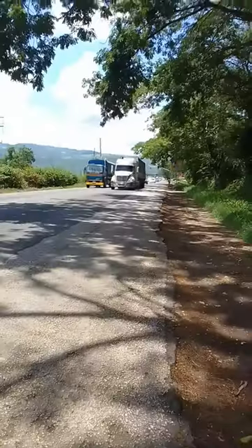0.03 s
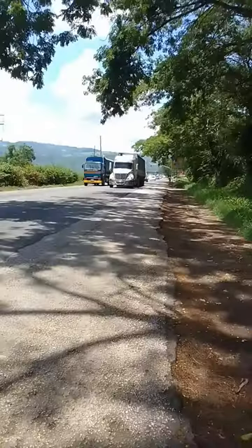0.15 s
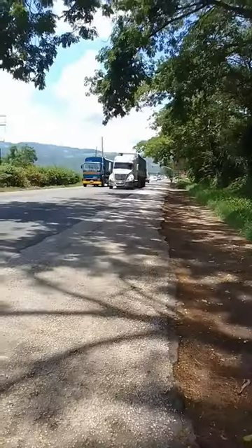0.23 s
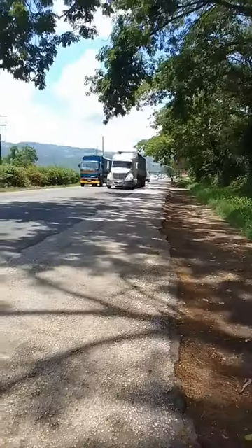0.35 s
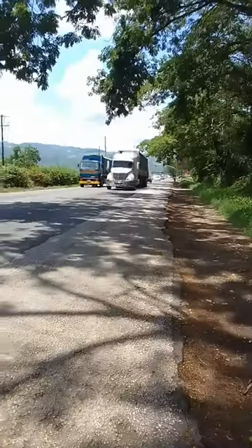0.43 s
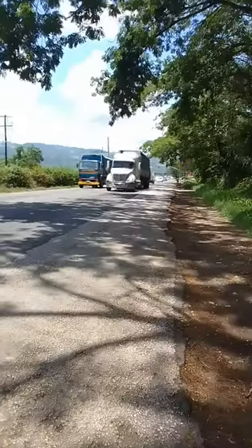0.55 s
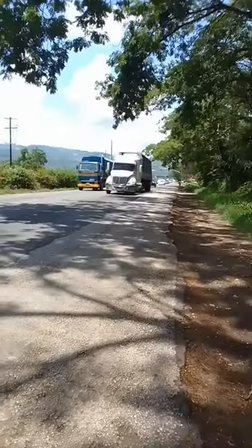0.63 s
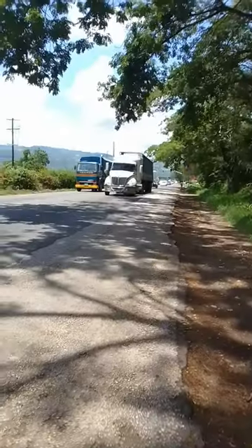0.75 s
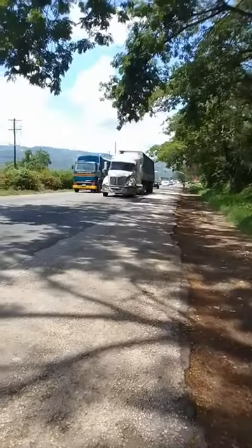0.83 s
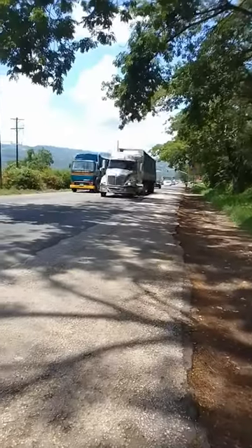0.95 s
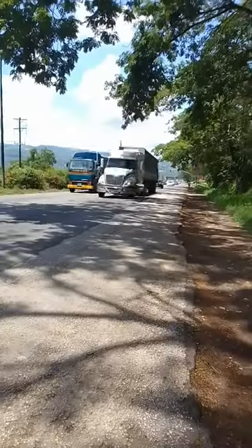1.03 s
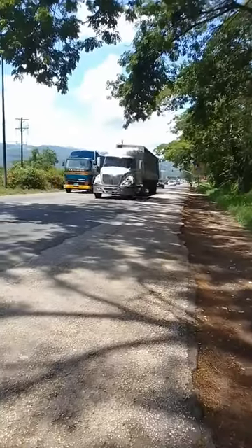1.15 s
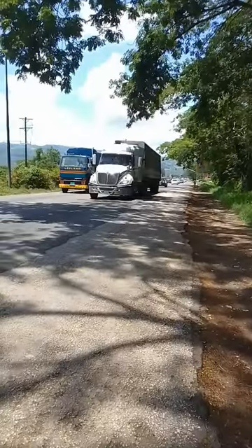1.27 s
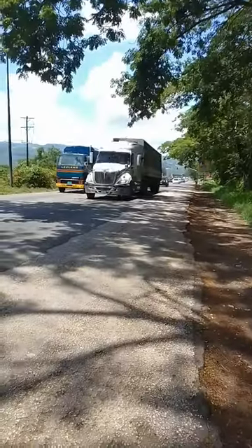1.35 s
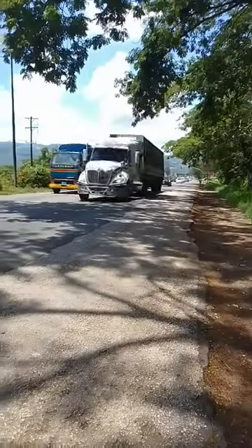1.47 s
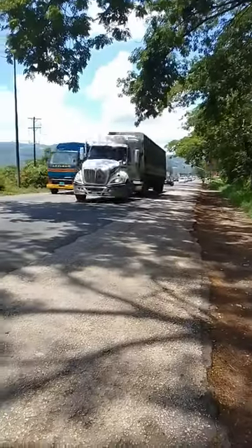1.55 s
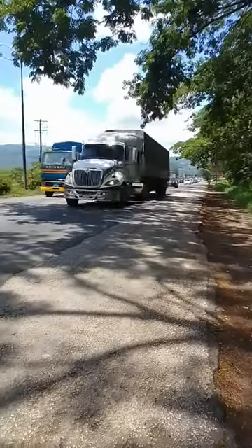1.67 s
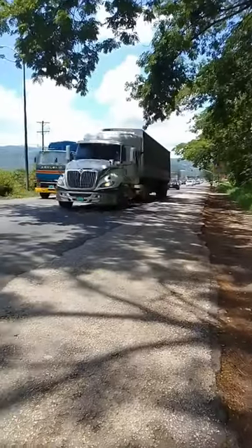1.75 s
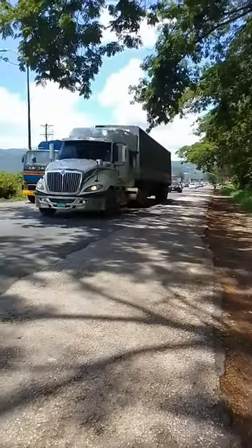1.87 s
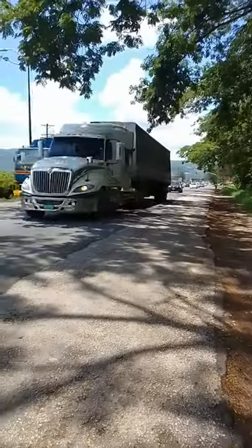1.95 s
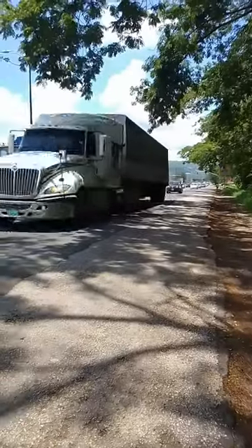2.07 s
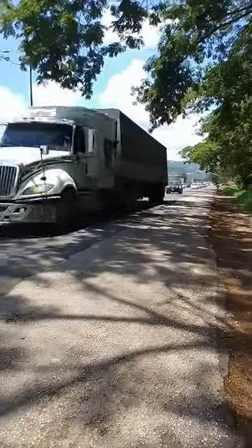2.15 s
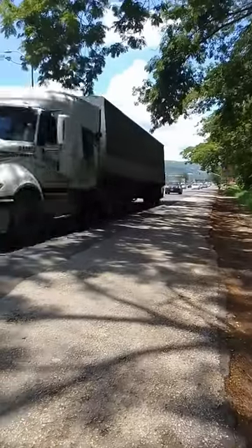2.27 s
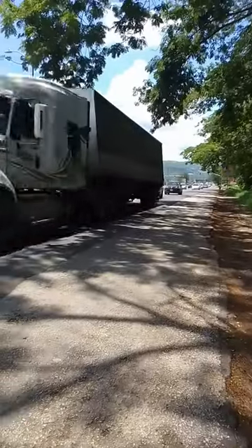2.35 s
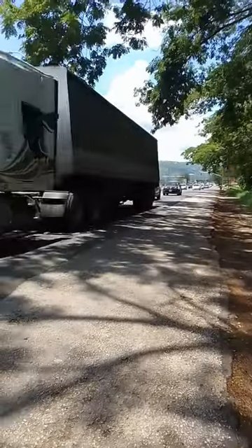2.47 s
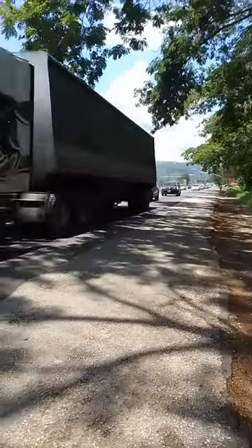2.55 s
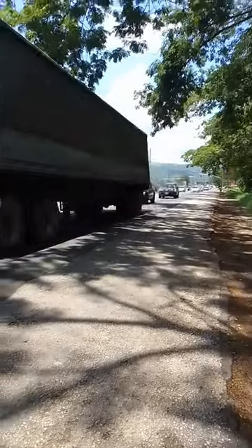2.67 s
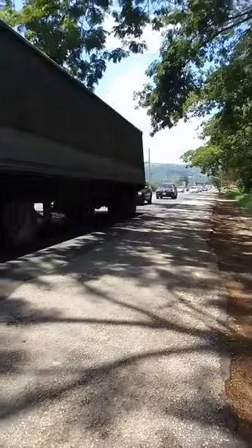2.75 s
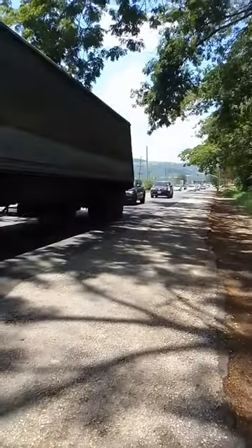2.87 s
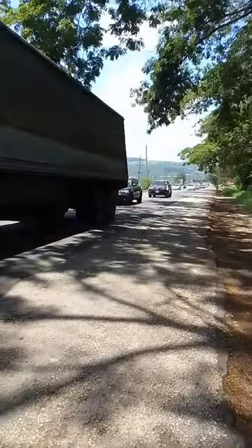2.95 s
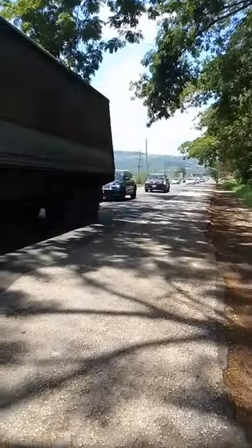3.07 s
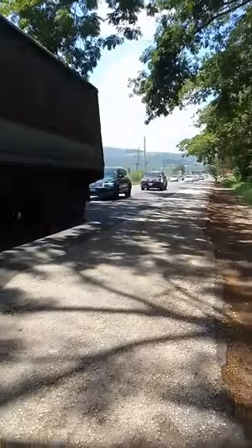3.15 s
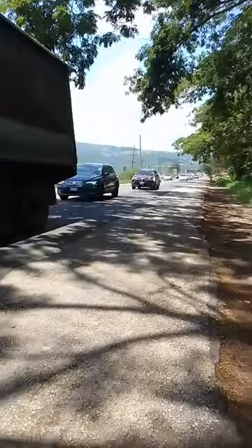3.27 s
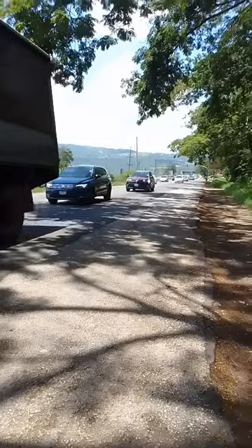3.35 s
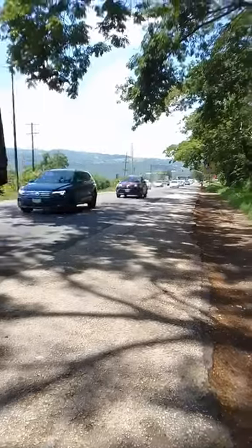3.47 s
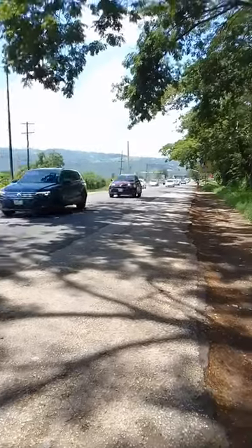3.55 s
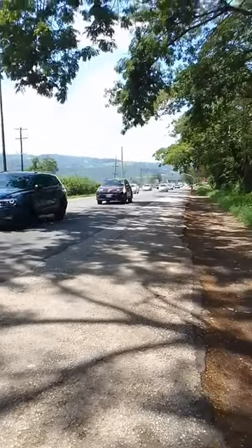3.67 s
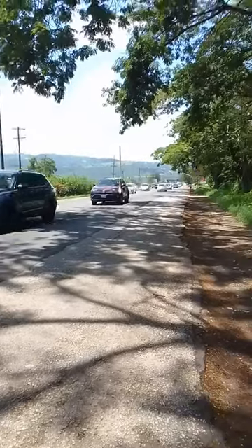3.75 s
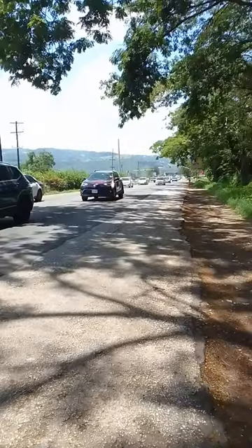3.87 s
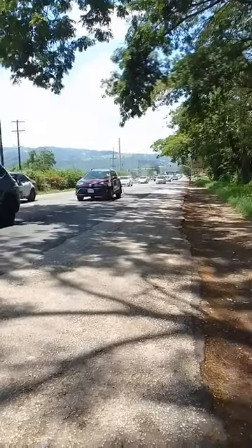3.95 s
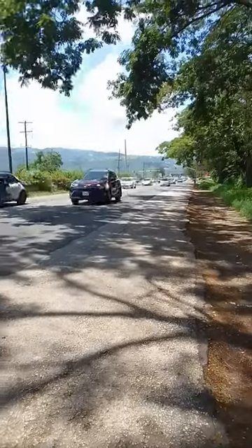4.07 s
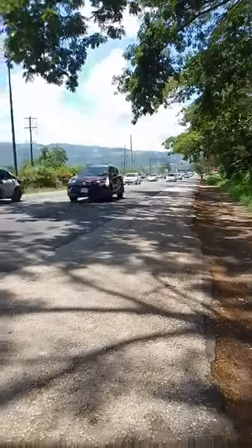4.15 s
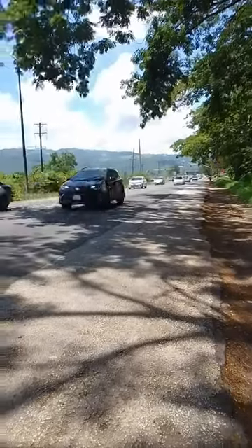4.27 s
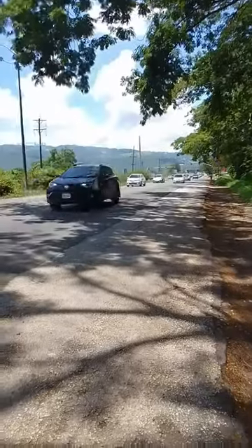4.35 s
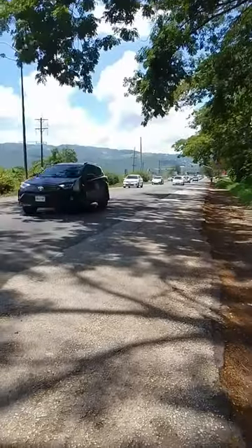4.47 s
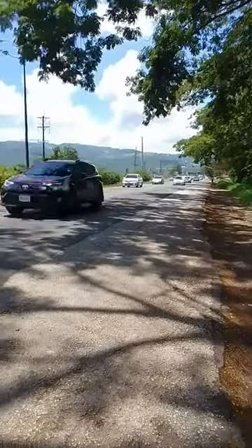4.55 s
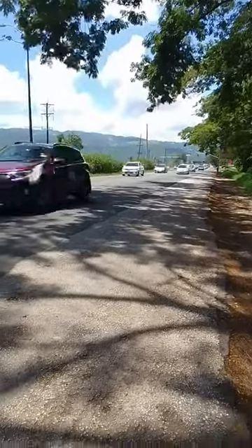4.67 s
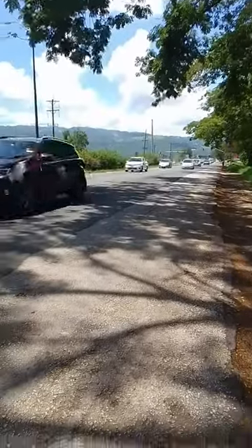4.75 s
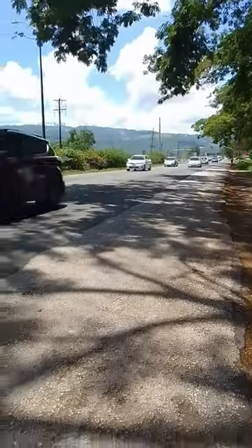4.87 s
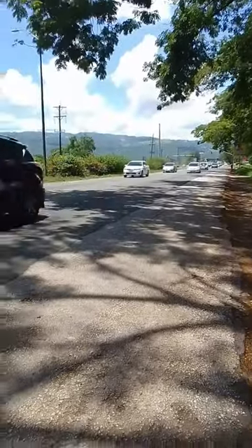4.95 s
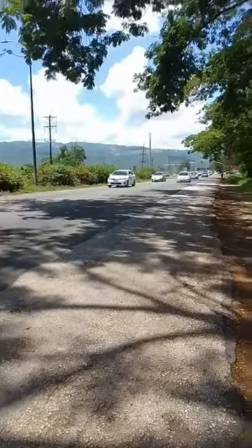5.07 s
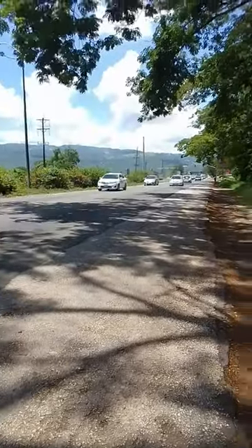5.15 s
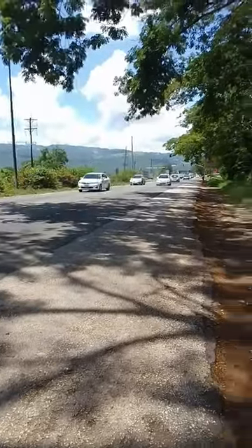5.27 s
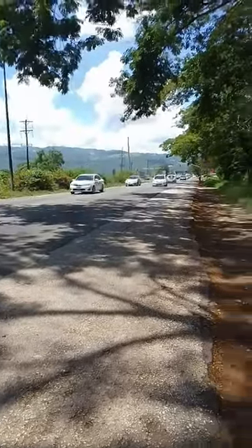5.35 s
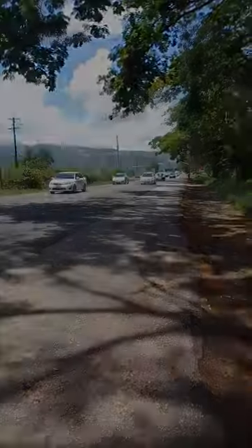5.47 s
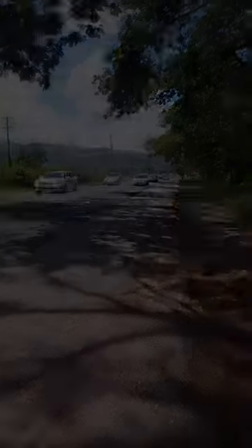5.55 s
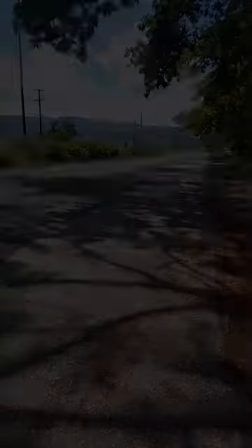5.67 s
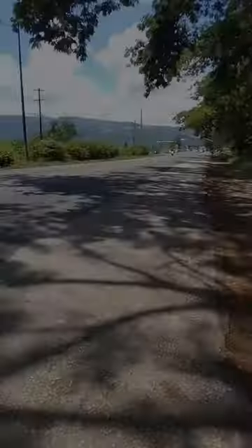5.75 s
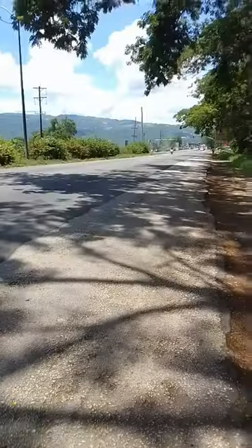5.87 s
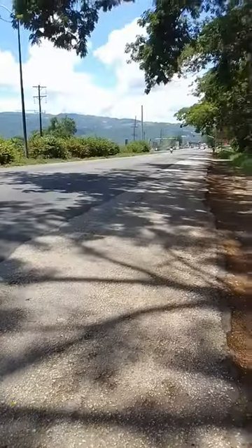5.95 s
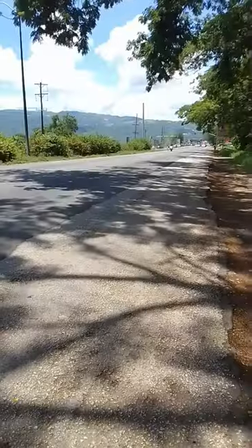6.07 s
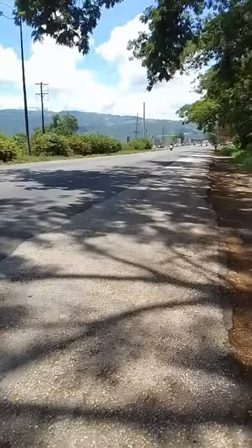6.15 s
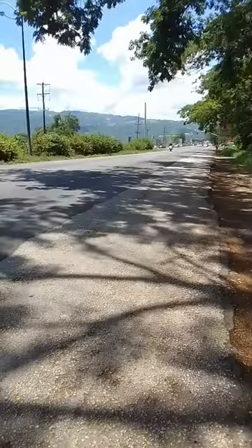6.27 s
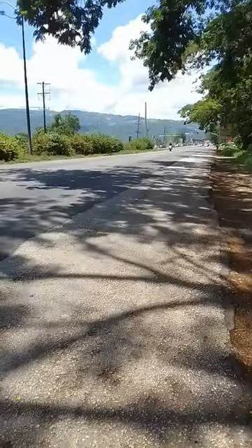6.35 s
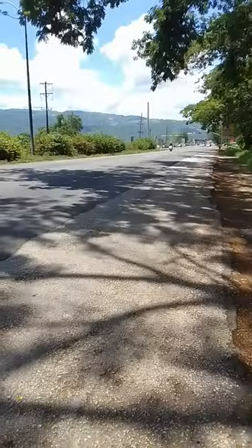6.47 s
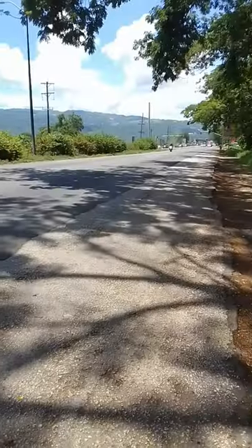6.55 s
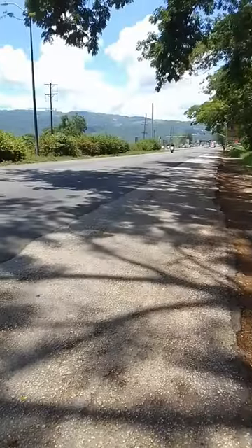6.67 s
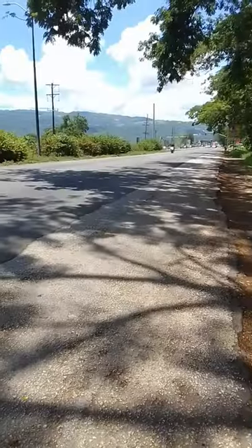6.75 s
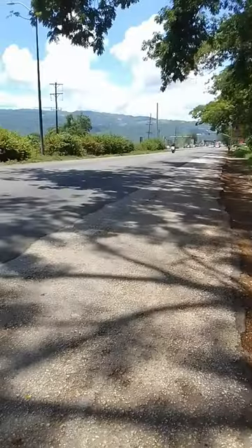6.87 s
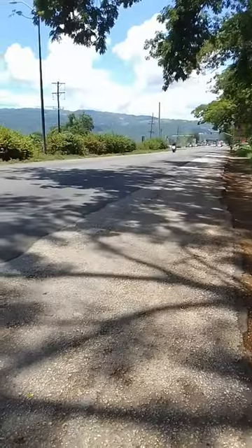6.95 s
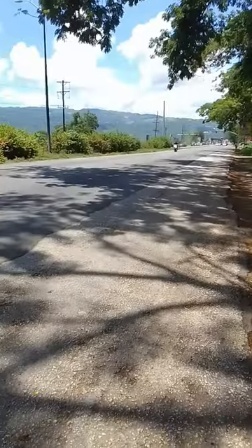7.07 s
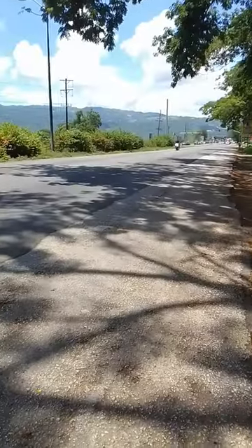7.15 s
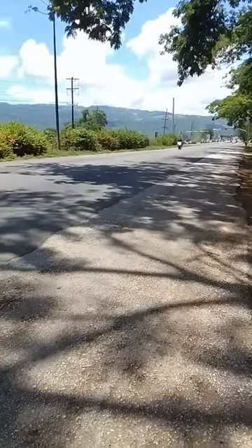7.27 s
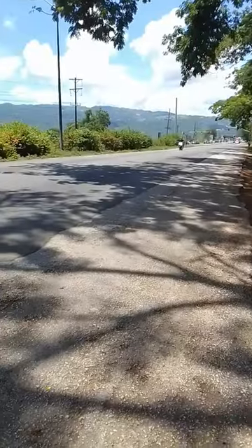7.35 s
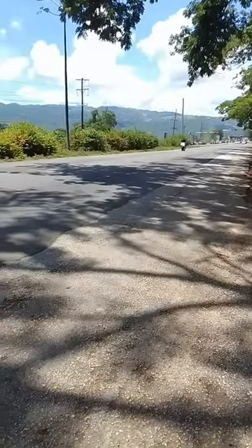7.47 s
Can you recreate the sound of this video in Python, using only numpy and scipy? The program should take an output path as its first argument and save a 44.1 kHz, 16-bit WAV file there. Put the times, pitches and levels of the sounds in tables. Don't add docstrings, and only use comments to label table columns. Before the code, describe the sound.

From 0 s a lorry approaches along an open road, its rough exhaust boom throbbing, with a short bark at the start and another at 0.7. Tyre roar, air hiss and a whirring fan swell from about 1 s to a loud close pass around 2.3-3.7, slightly overloading the microphone, the exhaust note sagging in pitch. Clipped air-horn toots sound at 3.0, 3.5, 3.85 and 3.95, the last two softer. Brake puffs, squeaks and trailer chirps scatter from 2.8 to 5.1. From about 4.2 a second diesel knocks quickly and unevenly while the rush recedes into following-car roar. At 5.64 everything cuts to silence. At 6.44 a much quieter, dull distant road appears with a far motorbike's fluttering, tonal drone, rising slowly. A tiny click falls at 6.75. At 7.25 the throttle shuts, pitch drops with a blip, recovers near 7.45, then falls into the new gear.

```python
import sys
import numpy as np
from scipy import signal
from scipy.fft import rfft, irfft, next_fast_len
from scipy.io import wavfile
from scipy.ndimage import uniform_filter1d, map_coordinates

SR = 44100
rng = np.random.default_rng(int(sys.argv[2]) if len(sys.argv) > 2 else 0)


def put_to_file(sound):
    columns = np.atleast_2d(sound).T
    safe = np.clip(columns, -1, 1)
    whole_steps = np.round(safe * 32767)
    wavfile.write(sys.argv[1], SR, whole_steps.astype(np.int16))


def to_linear_factor(level_db):
    exponent = np.asarray(level_db, float) / 20
    return 10 ** exponent


N = 331632

# time_s, nearness_db, engine_effort_db
LORRY_PASS = [(0.0, -36.5, 0.8), (0.5, -34.5, 0.7), (1.14, -29.5, -1.2), (1.25, -29.5, -0.6),
              (2.08, -24.5, 0.1), (2.26, -21, -1.3), (2.92, -19.5, -0.2), (3.07, -20.5, 2.8),
              (3.3, -21.5, 2.8), (3.5, -19, -2.5), (3.7, -21.5, 0.3), (4.15, -28.5, 1.2), (4.32, -29.5, 1),
              (4.88, -31, -4.2), (5.46, -35.5, -3.5), (5.63, -34, -3.5)]
# time_s, half_width_s, exhaust_change_db, air_change_db
SURGES = [(0.033, 0.056, 9.5, 1), (0.7, 0.019, 9, 0.5), (2.32, .05, 1, 1), (2.5, 0.025, 1, 2.5),
          (3.07, 0.024, -3.5, 10.5), (3.9, 0.038, 3.5, 1.5), (4.2, 0.028, -1.3, 3.5), (3.7, 0.08, -0.9, -4),
          (4.6, .007, 1.5, 7), (3.76, 0.044, -5, -.7), (2.5, 0.015, 0.5, 1), (4.0, 0.052, -4.5, 1.2),
          (6.3, 0.015, 4, 2), (4.615, 0.033, -7, 3.5), (4.69, 0.033, 0.6, 2.5), (2.42, 0.075, -1.5, -0.5)]
# frequency_hz, density_db
BOOM_COLOUR = [(18, -79.5), (30, -47), (70, -35.5), (119, -9), (225, 5), (274, 2.5), (309, 2.5),
               (347, -4.5), (444, -7), (500, -5), (650, -44.5), (1100, -120)]
# frequency_hz, density_db
ROAR_COLOUR = [(250, -39.5), (380, -1.5), (520, 2), (640, 2.5), (790, 1.5), (880, -2.5), (1000, -2),
               (1250, -4), (1550, -8), (1900, -12.5), (2500, -30.5), (3500, -29.5), (5000, -67.5)]
# frequency_hz, density_db
HISS_COLOUR = [(1500, -42.5), (2500, -2), (3500, -7), (5300, -9.5), (7000, -5.5), (8100, 0), (9300, -6),
               (11000, -15.5), (14000, -29), (16000, -32.5)]
# frequency_hz, density_db
FIZZ_COLOUR = [(8000, -39.5), (10500, -3), (12000, -5.5), (14000, -6.5), (16000, -12)]
# frequency_hz, density_db
FAN_COLOUR = [(1300, -40.5), (1700, 8.5), (2300, 11), (2700, -19), (3200, -36), (4500, -55.5)]
# time_s, half_width_s, third_gain_db, fourth_gain_db
PIPE_SWINGS = [
    (.6, 0.44, -13, 6),
    (2.0, .15, 3.5, 3),
    (2.5, 0.072, 7.5, -3),
    (2.68, .1, -7.5, 13.5),
    (3.22, .2, 12, 6),
    (3.8, 0.23, -9, -1.2),
]
HORN_OVERTONES = [(-0.5, -12, -5.5, -8, -22.5), (0, -4, -8, -21.5, -34.5), (-4, -2, -15, -21, -27.5)]
HORN_HZ = [415, 554, 791]
# start_s, length_s, low_horn_db, middle_horn_db, high_horn_db
TOOTS = [
    (3.027, 0.068, -36.5, -3, -4.5),
    (3.501, 0.084, -9, -11, -9),
    (3.854, .075, -40, -16.5, -15.5),
    (3.941, .06, -38, -17.5, -32),
]
TOOT_PITCH = [1.016, 1, 1, 1]
# start_s, length_s, centre_hz, width_hz, level_db
BRAKE_PUFFS = [(2.84, .04, 13000, 5000, -35), (3.04, .06, 9000, 12000, -27), (3.38, .03, 12000, 8000, -33),
               (3.415, .012, 11000, 8000, -29), (3.845, .012, 10000, 9000, -23),
               (3.82, .07, 11300, 200, -35), (4.0, .11, 11100, 200, -35), (4.165, .03, 13400, 300, -39),
               (4.258, .02, 8100, 5000, -26), (4.25, .05, 15500, 300, -49), (4.53, .09, 15470, 300, -51),
               (4.325, .03, 4200, 500, -30), (4.51, .03, 4300, 400, -33), (4.225, .025, 10900, 300, -37),
               (4.298, .02, 5600, 200, -31), (4.585, .045, 9700, 250, -26), (4.6, .035, 7000, 11000, -28),
               (4.655, .04, 9900, 500, -29), (4.67, .01, 4000, 3000, -29), (4.75, .03, 3000, 700, -29),
               (4.93, .15, 8200, 800, -28), (4.7, .02, 4500, 600, -33)]
# start_s, end_s, level_db
RATTLE = (3.25, 5.1, -37)
CYLINDER_DB = [0, -14, -6, -12, -9, -14]
# centre_hz, width_hz, level_db
BLOCK_MODES = [(187, 31, 11.5), (253, 44, 4), (740, 30, 1.5), (946, 130, 7), (1298, 400, -3.5),
               (3090, 1500, -24)]
# start_s, end_s
SILENCE = (5.6362, 6.4352)
# time_s, firing_hz, throttle_db
GEAR_SHIFT = [
    (7.25, 237.5, -0.9),
    (7.28, 222, -12),
    (7.315, 226, -1),
    (7.36, 207, -6.5),
    (7.397, 180, -10),
    (7.43, 205, -2),
    (7.46, 221, 1.5),
    (7.485, 228, 2.5),
    (7.52, 190, -1),
]
# multiple, level_db, db_per_throttle_db, flutter_crest_db, flutter_trough_db
BIKE_TONES = [(1, -20.5, 0.52, -2.5, -0.3), (2, -29.5, 1.7, 3.5, -5.5), (3, -40, 0.88, -11, -0.5),
              (5, -45.5, .6, -9.5, -2)]
BIKE_ORDERS = [.75, 1.75, 2.25, 2.5, 4, 4.25, 5.25, 6, 7, 8]
ORDER_DB = [-30, -37, -38, -42, -33, -46, -48, -48, -43, -48]
# frequency_hz, density_db
FAR_COLOUR = [(24, -74.5), (70, -31.5), (150, -5.5), (190, -2.5), (300, -10), (420, -20.5), (560, -16),
              (700, -10.5), (1000, -24.5), (1600, -29), (2400, -40.5), (3000, -45.5), (9000, -51),
              (15700, -55.5)]
# time_s, level_db
CLICK = (6.747, -31)


def unit(x):
    return x / np.sqrt(np.mean(x ** 2) + 1e-20)


def curves(rows):
    time_s, *columns = np.transpose(rows)
    return [np.interp(np.arange(N) / SR, time_s, column) for column in columns]


def wobble(rate):
    knots = rng.standard_normal(int(N * rate / SR) + 4)
    return map_coordinates(knots, [np.arange(N) * rate / SR])


def step(at_s, width_s):
    u = (np.arange(N) / SR - at_s) / width_s
    return (1 + u / np.sqrt(1 + u * u)) / 2


def bumps(rows):
    t = np.arange(N) / SR
    return sum(np.outer(db, np.exp(-((t - s) / width) ** 2)) for s, width, *db in rows)


def window(start_s, length_s, edge_s):
    t = np.arange(N) / SR - start_s
    return np.clip(np.minimum(t, length_s - t) / edge_s + .5, 0, 1) ** 2


def filtered(x, response):
    size = next_fast_len(N + 8192)
    return irfft(rfft(x, size) * response(np.fft.rfftfreq(size, 1 / SR)), size)[:N]


def rush(colour, patchy_db, gate=1):
    z = signal.stft(rng.standard_normal(N + 512), nperseg=512)[2]
    patches = uniform_filter1d(rng.standard_normal(z.shape), size=4, axis=0)
    patches = uniform_filter1d(patches, size=10, axis=1)
    noise = signal.istft(z * to_linear_factor(patchy_db * unit(patches)), nperseg=512)[1][:N]
    f, db = np.transpose(colour)
    response = lambda hz: to_linear_factor(np.interp(np.log(hz + 1), np.log(f), db, -120, -120))
    return unit(filtered(noise * gate, response))


def far_road():
    gaps = lambda f: np.where(f > 2300, np.abs(np.sin(np.pi * f / 1510)) ** .7, 1)
    return to_linear_factor(-38.5) * filtered(rush(FAR_COLOUR, 1.8), gaps)


def small_click():
    click = np.zeros(N)
    click[int(CLICK[0] * SR)] = to_linear_factor(CLICK[1])
    return filtered(click, lambda f: 6 / (1 + (f / 2600) ** 4))


def motorbike():
    t = np.arange(N) / SR
    start_hz, climb_hz_per_s = 227, 13
    shift_hz, throttle_db = curves(GEAR_SHIFT)
    climbing_hz = start_hz + climb_hz_per_s * (t - SILENCE[1])
    firing_hz = np.where(t < GEAR_SHIFT[0][0], climbing_hz, shift_hz)

    since = t - 6.534
    flutter_hz, slows_hz_per_s = 15.6, 8.3
    crest = (1 + np.cos(2 * np.pi * (flutter_hz - slows_hz_per_s * since) * since)) / 2
    flutter = window(0, 6.87, .05)
    levels = []
    for _, db, grows, up_db, down_db in BIKE_TONES:
        swing_db = up_db * crest + down_db * (1 - crest)
        levels.append(db + grows * throttle_db + flutter * swing_db)

    clutch_s = 7.265
    shut_db = -24 * window(clutch_s, .2, .02) - 6 * (t > clutch_s)
    levels[-1] = levels[-1] + shut_db

    phase = 2 * np.pi * np.cumsum(firing_hz * (1 + .003 * wobble(50))) / SR
    tones = np.zeros(N)
    for k, db, lag in zip((1, 2, 3, 5), levels, (0, .6, 2, 2.5)):
        tones += to_linear_factor(db + .9 * wobble(40)) * np.sin(k * phase + lag)
    for k, db in zip(BIKE_ORDERS, ORDER_DB):
        order_db = levels[0] + db + shut_db * (k > 3) / 2 + 2.4 * wobble(29)
        tones += to_linear_factor(order_db) * np.sin(k * phase)
    return np.sqrt(2) * tones


def diesel():
    first_s, cycle_s, count = 4.1008, .09455, len(CYLINDER_DB)
    k = np.arange(int((SILENCE[0] - first_s) / cycle_s * count))
    chance = rng.standard_normal((len(k), 2))
    at_s = first_s + k * cycle_s / count + .0003 * chance[:, 0]
    blows = np.zeros(N)
    blows[(at_s * SR).astype(int)] = to_linear_factor(np.array(CYLINDER_DB)[k % count] + 0.71 * chance[:, 1])
    decay = np.exp(-np.arange(SR // 40) / SR / .004)
    gas = signal.fftconvolve(blows, decay)[:N] * rng.standard_normal(N)

    def block(f):
        total = 0
        for j, (centre, width, db) in enumerate(BLOCK_MODES):
            mode = 1j * f * width / (centre * centre - f * f + 1j * f * width)
            total = total + (-1) ** j * to_linear_factor(db) * mode
        return total / (1 + (f / 2800) ** 4)

    knock = unit(filtered(blows + .05 * gas, block))
    level_db = -23 - 19 * (1 - step(4.3, .08)) - 5.5 * step(5.3, 0.084)
    return to_linear_factor(level_db) * knock


def brakes(count=110):
    out, size = np.zeros(N), 8192
    f, t = np.fft.rfftfreq(size, 1 / SR), np.arange(size) / SR
    start, end, rattle_db = RATTLE
    chirps = []
    for a, b, c, d, e in rng.random((count, 5)):
        hz, width = 2400 * 4.1 ** c, 250 + 900 * d
        level_db = rattle_db - 6 * c + 8 * e
        chirps.append((start + (end - start) * a, 0.0091 + 0.02 * b, hz, width, level_db))
    for s, length, hz, width, db in list(BRAKE_PUFFS) + chirps:
        band = 1 / (1 + (2 * (f - hz) / width) ** 2)
        air = unit(irfft(rfft(rng.standard_normal(size)) * band))
        shape = np.clip(t / .004, 0, 1) * np.exp(-(t / length) ** 3)
        out[int(s * SR):][:size] += to_linear_factor(db) * air * shape
    return out


def horns():
    out, t = np.zeros(N), np.arange(N) / SR
    for (s, length, *levels), factor in zip(TOOTS, TOOT_PITCH):
        near = slice(int((s - .02) * SR), int((s + length + .02) * SR))
        edge = window(s, length, .009)[near]
        for hz, overtones, level_db in zip(HORN_HZ, HORN_OVERTONES, levels):
            turn = 2 * np.pi * hz * factor * t[near]
            stack = sum(to_linear_factor(db) * np.sin((j + 1) * turn + j * j) for j, db in enumerate(overtones))
            out[near] += np.sqrt(2) * to_linear_factor(level_db) * stack * edge
    return out


def lorry():
    near_db, effort_db = curves(LORRY_PASS)
    firing_hz = 76.45 * (1 + .0255 * (1 - 2 * step(2.85, .3)))
    return near_db + 22, effort_db, firing_hz


def exhaust_note():
    near_db, _, firing_hz = lorry()
    levels = np.array([-20, -21])[:, None] + .6 * near_db + bumps(PIPE_SWINGS)
    phase = 2 * np.pi * np.cumsum(firing_hz * (1 + .012 * wobble(30))) / SR
    tones = sum(to_linear_factor(db + 3.5 * wobble(25)) * np.sin(k * phase) for k, db in zip((3, 4), levels))
    return np.sqrt(2) * tones * window(-1.4, 5.1, 0.16)


def firing_throb(firing_hz):
    turn = np.cumsum(firing_hz * (1 + .06 * wobble(20))) / SR
    puff = np.exp(-4 * (turn % 1)) * to_linear_factor(4.9 * np.cos(np.pi * turn) + 0.69 * wobble(40))
    return 1 + .12 * (unit(puff) - 1)


def cooling_fan():
    level_db = -24.5 - 13 * (1 - step(1.1, 0.27)) - 21 * step(3.15, .2)
    return to_linear_factor(level_db) * rush(FAN_COLOUR, 0.5)


def with_road_bounce(direct):
    path_ms = 1.97 - .45 * step(2.4, .7)
    strength = .72 - (.72 - .1) * step(2.52, .15)
    asphalt = lambda hz: np.exp(1.8j) / np.sqrt(1 + (hz / 2100) ** 4)
    late = map_coordinates(filtered(direct, asphalt), [np.arange(N) - path_ms * SR / 1000], order=3)
    return (direct + strength * late) / np.sqrt(1 + strength ** 2)


def traffic():
    near_db, effort_db, firing_hz = lorry()
    bark_db, air_db = bumps(SURGES)
    gate = firing_throb(firing_hz)
    shared = wobble(5.3)

    boom_db = -8.5 + .75 * near_db + effort_db + bark_db
    roar_db = -10 + 0.72 * near_db + 2.5 * step(5.46, .3) + 0.25 * air_db
    hiss_db = -18 + 0.95 * near_db + air_db
    fizz_db = -33.5 + 1.4 * near_db + 1.3 * air_db

    toot = sum(to_linear_factor(max(db)) * window(s, length, .015) for s, length, *db in TOOTS)
    boom = to_linear_factor(boom_db + .5 * shared + 1.2 * wobble(12)) * rush(BOOM_COLOUR, 1.5, gate) / (1 + 2.2 * toot)
    roar = to_linear_factor(roar_db + 0.27 * shared + 0.24 * wobble(11)) * rush(ROAR_COLOUR, 1.4, gate)
    hiss = to_linear_factor(hiss_db + .3 * shared + .6 * wobble(18)) * rush(HISS_COLOUR, 1.2, gate)
    fizz = to_linear_factor(fizz_db + .9 * wobble(26)) * rush(FIZZ_COLOUR, 1.5)
    return boom + fizz + with_road_bounce(roar + hiss + cooling_fan())


def scene():
    t = np.arange(N) / SR
    roadside = diesel() + brakes() + horns() + exhaust_note() + traffic()
    distance = far_road() + small_click() + motorbike()
    fade_in = np.clip((t - SILENCE[1]) / .001, 0, 1)
    return (roadside * (t < SILENCE[0]) + distance * fade_in)[None]


def band_limit(x):
    return signal.sosfilt(signal.butter(12, 15840, fs=SR, output="sos"), x)


def record(dry):
    ceiling = .92
    soft = dry / (1 + np.abs(dry / ceiling) ** 4) ** (1 / 4)
    bass_cut = lambda hz: np.maximum(hz ** 4 / (hz ** 4 + 95 ** 4), to_linear_factor(-14))
    thin = filtered(soft[0], lambda hz: bass_cut(hz) * (hz < 15790))
    return band_limit(thin[None])


dry = scene()
out = record(dry)
put_to_file(out)
```